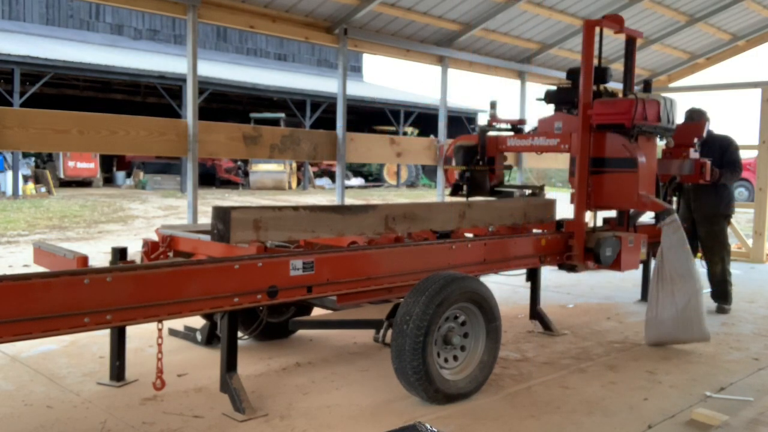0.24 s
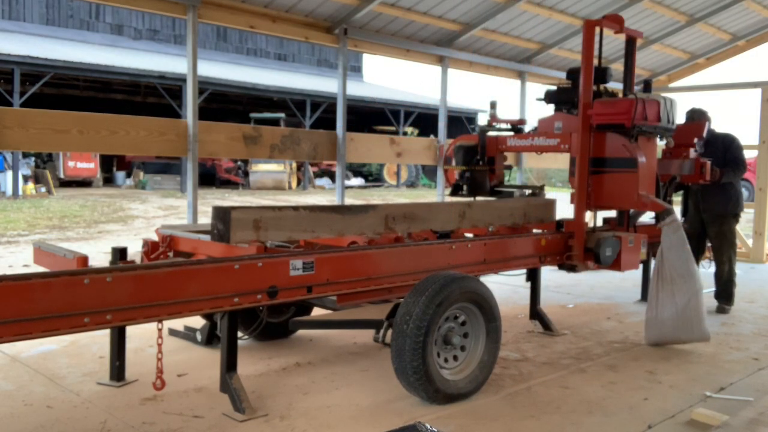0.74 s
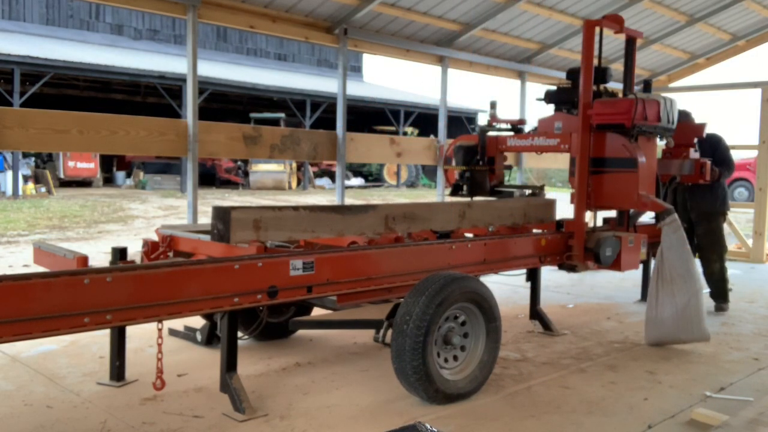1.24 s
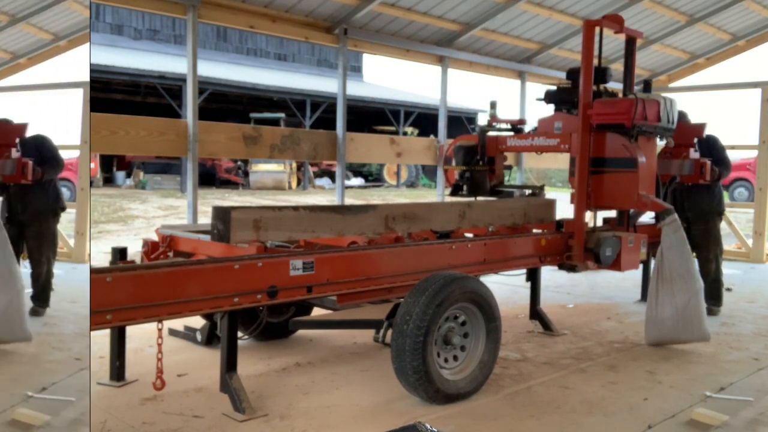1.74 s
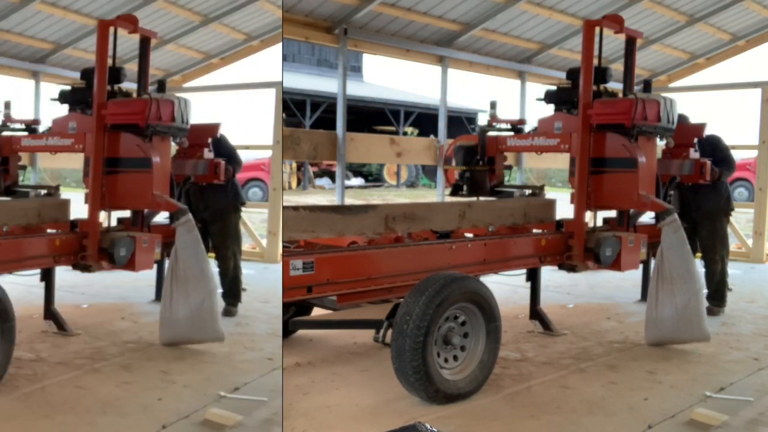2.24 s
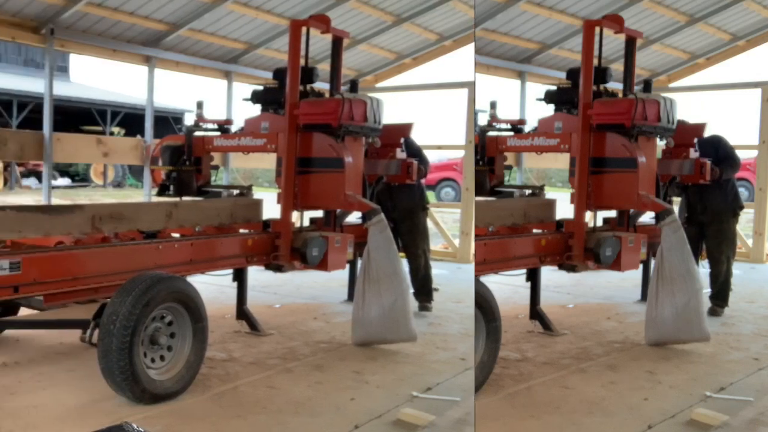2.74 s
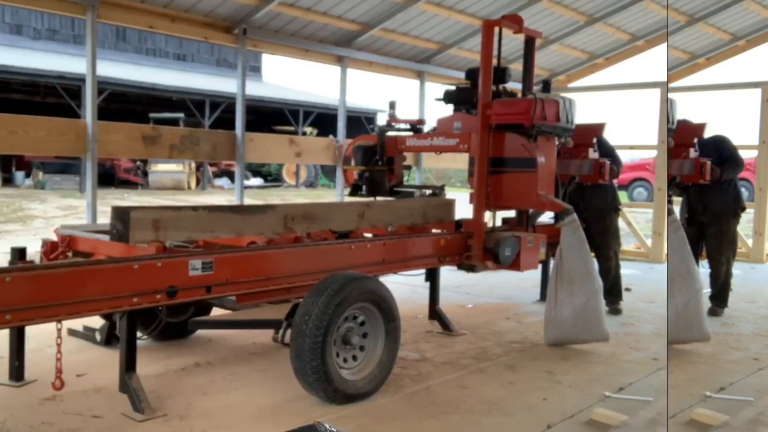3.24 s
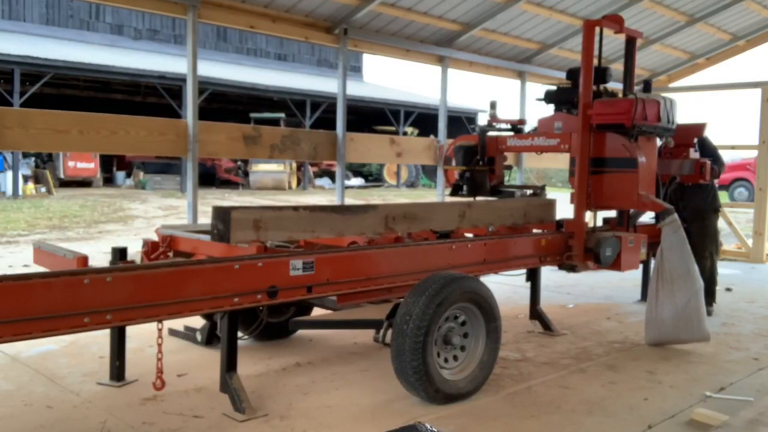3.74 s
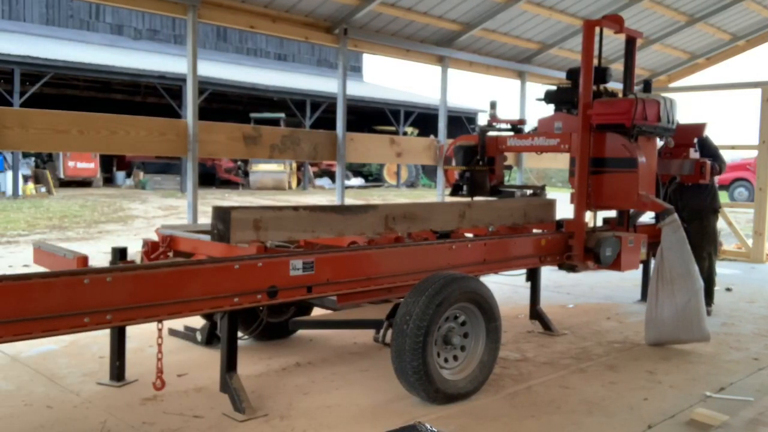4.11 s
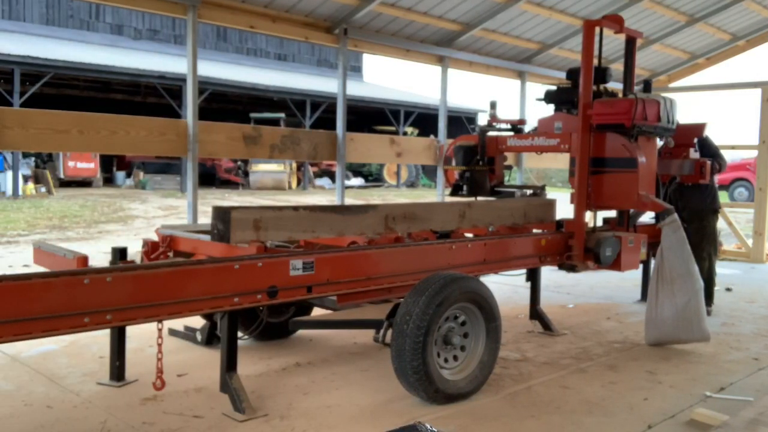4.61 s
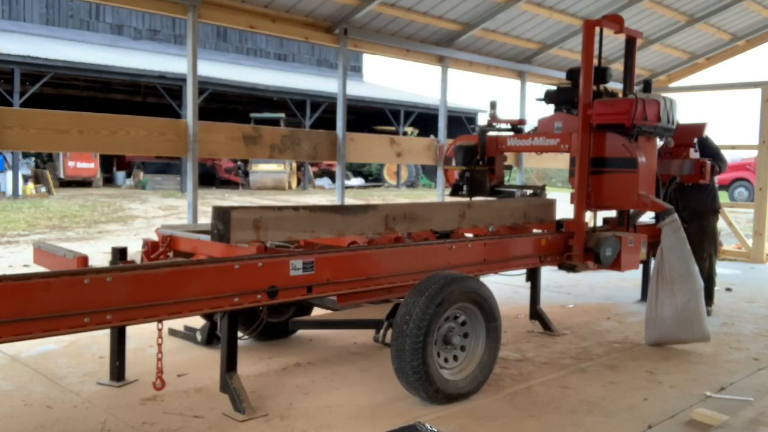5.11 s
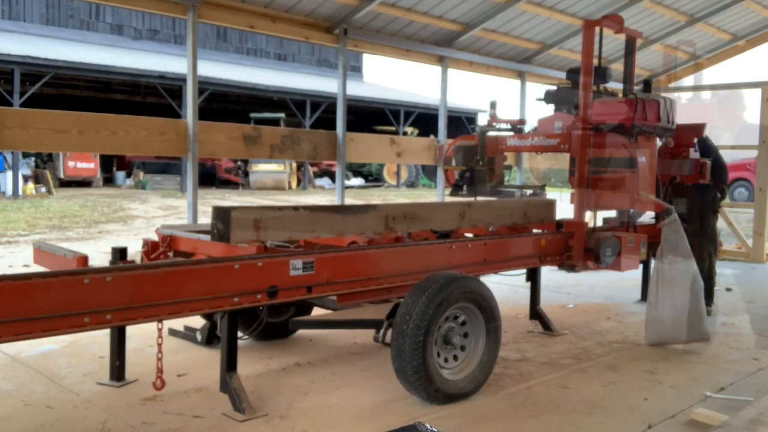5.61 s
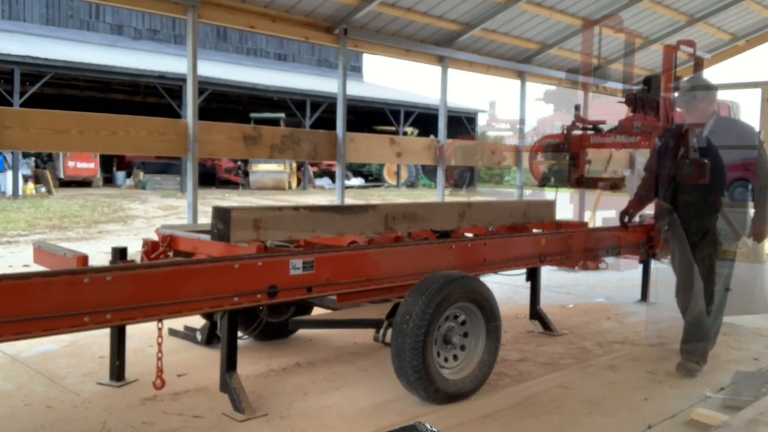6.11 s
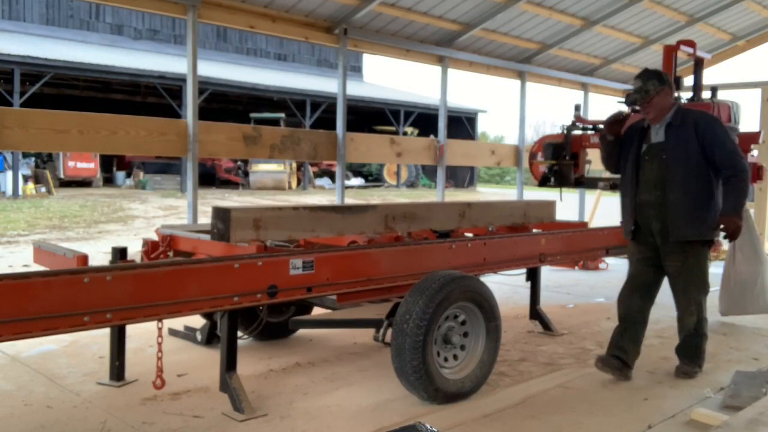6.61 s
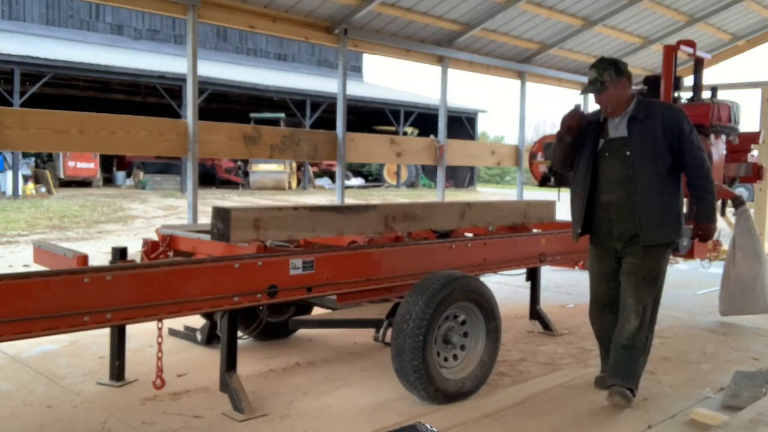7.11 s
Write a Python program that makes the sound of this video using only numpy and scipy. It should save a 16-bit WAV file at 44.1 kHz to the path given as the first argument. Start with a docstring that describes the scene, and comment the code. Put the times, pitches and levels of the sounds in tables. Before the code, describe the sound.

Brief belt screech, chugging engine revving up, steady bandsaw hiss and drone in an open shed, fading into faint rumble and gritty boot steps.

```python
"""A drive belt squeals while an engine labours up to speed and settles, in a portable bandsaw mill in an
open shed; the blade hisses and the casing roars. Resonated noise makes the squeal, filtered pulses the
exhaust blows, sine orders the free-running engine, and shaped noise the hiss and roar.
The mill fades away into a quiet yard: a far rumble of dull noise, a faint whine of narrow noise bands,
and boots on grit made of decaying noise."""
import sys
import numpy as np
from scipy import signal
from scipy.fft import rfft, irfft
from scipy.io import wavfile
from scipy.ndimage import uniform_filter1d

SR = 44100
rng = np.random.default_rng(int(sys.argv[2]) if len(sys.argv) > 2 else 0)


def persist_wave(psi):
    """Save psi, clipped to +-1, as 16-bit WAV."""
    counts = np.round(np.clip(psi, -1, 1) * 32767).astype(np.int16)
    wavfile.write(sys.argv[1], SR, np.atleast_2d(counts).T)


def gain_from_db(level_db):
    """Convert decibel levels to linear amplitude factors (20 dB per decade)."""
    decades = np.asarray(level_db, float) / 20
    return 10 ** decades


N = 324471  # length [samples]

# Engine speed, rising from idle, overshooting and settling: (time [s], four-stroke cycles [1/s])
ENGINE_SPEED = [(0, 11.3), (.15, 11.8), (.3, 13.4), (.7, 23.9), (1.05, 31.2), (1.3, 32.4), (1.8, 30.8),
                (2.5, 31.45), (3.2, 31.1), (4.3, 31), (5.2, 31.6), (5.75, 31.4)]
# Engine lines running free: (multiple of the cycle rate [1], relative level [dB])
CRANK_ORDERS = [(1, -30), (2, 0.5), (3, -18), (4, -16.5), (5, -12), (7, -2), (8, 1)]
DRONE_ORDERS = [(6, -1), (12, -20), (13, -17.5), (16, -17), (20, -15.5)]
# Level added to the drone orders, unsteady at first: (time [s], level [dB])
DRONE_LEVEL = [(1.1, -30), (1.4, -46), (1.53, -36), (1.6, -43), (1.72, -36.5), (1.97, -34.5), (2.42, -47),
               (2.8, -36), (4.4, -34), (5.15, -36), (5.23, -37.5), (5.37, -35.5), (6.5, -33)]
# Exhaust blows while labouring against the load: (time [s], level [dB])
LABOUR_LEVEL = [(0, -31), (.05, -27), (.25, -29.5), (.3, -23.5), (.52, -23.5), (.68, -26.5), (.93, -19.5),
                (1.0, -22.5), (1.08, -29), (1.5, -27.5)]
# Response of the exhaust pipe: (frequency [Hz], relative gain [dB])
PIPE_RESPONSE = [(20, -34), (40, -10.5), (60, 2), (85, -4.5), (125, -3.5), (175, 2), (230, -8),
                 (400, -16.5), (700, -35), (1500, -34)]
# Long waves leave the open shed: (frequency [Hz], gain into the echoes [dB])
SHED_RESPONSE = [(60, -19.5), (130, 0), (20000, 0)]

# Running mill: (time [s], blade hiss level [dB], casing roar level [dB])
MILL_LEVEL = [(0, -34, -26.5), (.07, -30.5, -28.5), (.29, -19.5, -25.5), (.54, -17.5, -24.5),
              (.85, -18.5, -24.5), (1.4, -21, -28.5), (1.6, -22.5, -30.5), (2.5, -26, -34.5),
              (3.0, -25.5, -34.5), (3.3, -24.5, -32.5), (4.9, -24.5, -32), (5.26, -26.5, -32),
              (5.45, -24.5, -32), (6.5, -24.5, -32)]
# Blade hiss spectrum: (frequency [Hz], relative density [dB])
HISS_SPECTRUM = [(1500, -42), (3000, -28.5), (4500, -10), (6000, -7.5), (7500, -9), (8400, 0.5),
                 (9300, -4.5), (10500, -0.5), (12500, -4), (14400, -1.5), (15600, -6), (16300, -67)]
# Blade hiss: (frequency [Hz], left-right likeness [1])
HISS_LIKENESS = [(3000, 0.15), (6000, 0.32), (7500, 1.0), (15000, 0.93)]
# The hiss tilts about 9 kHz as the blade settles: (time [s], added slope [dB per octave])
HISS_TILT = [(0, -6.5), (.5, -3.5), (1.2, 0.5), (2.5, 2.5), (4, 5), (6.5, 1)]
# Ringing of the taut blade: (frequency [Hz], bandwidth [Hz], level relative to the hiss [dB])
BLADE_MODES = [(3457, 50, -40.5), (4400, 50, -37), (4580, 41, -34), (4920, 19, -25.5), (5320, 60, -36.5),
               (6566, 32, -19.5), (7200, 72, -20), (7500, 54, -21), (7630, 40, -32.5), (8660, 82, -16.5)]
# Casing roar spectrum: (frequency [Hz], relative density [dB])
ROAR_SPECTRUM = [(20, -40), (45, -11), (100, -11.5), (140, -4.5), (200, -1), (330, -1), (400, 0.5),
                 (460, -4), (600, -0.5), (900, -2.5), (1500, -5), (1700, -6.5), (2450, -8.5), (3100, -11.5),
                 (4500, -8.5), (6000, -20.5), (9000, -45)]
# Casing roar: (frequency [Hz], left-right likeness [1])
ROAR_LIKENESS = [(60, 0.98), (200, 1), (350, 0.64), (650, 0.28), (1400, 0.83), (1900, .2), (2600, 0.34),
                 (6000, 0.11)]
# Casing roar: (frequency [Hz], left minus right level [dB])
ROAR_BALANCE = [(60, 1), (240, -1), (950, -3), (3770, -2), (15000, -2)]
# Casing roar: (frequency [Hz], phase lag of the right channel [rad])
ROAR_LAG = [(60, -0.5), (600, -0.34), (1500, -1.06), (2200, -1.5), (3000, -2.5), (4000, -1.5), (5000, 7)]

# Boot contacts: (time [s], scuff level [dB], tick level [dB], thud level [dB], scuff tilt [dB per octave])
BOOT_STEPS = [(6.578, -61.5, -60, -51, -10), (6.711, -71.5, -59, -65, -9), (7.066, -74, -66, -75, -8),
              (7.089, -50, -50, -51, -5.5), (7.098, -54, -56, -37, -13.5), (7.116, -55, -60, -45, -13.5),
              (7.241, -60, -36.5, -63, -5)]
# Thud of the sole: (frequency [Hz], relative gain [dB])
SOLE_RESPONSE = [(60, -15), (180, 4), (300, -2.5), (450, -5.5), (700, 3), (900, -15), (1200, -2),
                 (1500, -9), (2050, -4), (2500, -9), (6000, -37)]
# Tick of grit: (frequency [Hz], relative gain [dB])
TICK_RESPONSE = [(2500, -23), (5000, -1), (15500, -1), (17000, -63)]
# Yard wash spectrum: (frequency [Hz], relative density [dB])
YARD_SPECTRUM = [(25, -36), (60, -9), (87, -3.5), (127, -15), (223, -16), (330, -30), (560, -23.5),
                 (950, -23.5), (1700, -26), (2600, -36), (3500, -46.5), (5000, -58), (16000, -67.5)]
# Yard wash: (frequency [Hz], left-right likeness [1])
YARD_LIKENESS = [(60, 1), (380, 0.57), (2400, 0.055), (6000, 0.19), (9000, 0.81)]
# Far whine tones: (frequency [Hz], bandwidth [Hz], relative level [dB])
WHINE_TONES = [(75.2, 6.7, -54), (217.8, 10.5, -59), (559, 14, -67), (824, 31, -62.5), (1560, 30, -66),
               (1730, 60, -72)]
# Level added to all the whine tones: (time [s], level [dB])
WHINE_LEVEL = [(6.0, -9), (6.45, 2.5), (6.7, 1.5), (6.85, -10), (7.4, -14)]

FADE_FROM_S, FADE_TO_S = 5.424, 6.453  # the mill fades out while the yard fades in
FREE_FROM_S, FREE_RISE_S = 1.1, .35  # the clean orders take over as the load comes off
CRANK_DB, CRANK_EXTRA_DB, CRANK_SETTLE_S = -45, 14, 0.18  # added to the orders, from a louder start
SQUEAL_DB, SQUEAL_FALL_DB_PER_S = -15, 61  # the slip eases
GRIP_S, GRIP_FALL_DB_PER_S = .125, 170  # then the belt grips: further fall from this time
SQUEAL_TOP_HZ, SQUEAL_RISE_HZ, SQUEAL_RISE_S = 1515, 370, 0.06  # the tone climbs towards its top
GUARD_DB, GUARD_DROP_DB, GUARD_S = -2.5, 8.5, .045  # guard tones relative to the squeal, dropping sooner


def engine():
    """Periodic firing gives harmonic orders when running free, and two uneven blows a cycle under load."""
    cycles = np.cumsum(along(ENGINE_SPEED, silent=False)[0]) / SR
    free_s = np.arange(N) / SR - FREE_FROM_S
    rise = np.clip(free_s / FREE_RISE_S, 0, 1)
    crank_db = CRANK_DB + CRANK_EXTRA_DB * np.exp(-np.maximum(free_s, 0) / CRANK_SETTLE_S)
    running = np.zeros(N)
    for orders, db in [(CRANK_ORDERS, crank_db), (DRONE_ORDERS, along(DRONE_LEVEL)[0])]:
        lines = sum(gain_from_db(g) * np.sin(2 * np.pi * (k * cycles + rng.random())) for k, g in orders)
        running += np.sqrt(2) * gain_from_db(db) * lines * rise

    pulses = np.zeros(N)
    for place, db in [(0, 0.5), (.375, -0.5)]:  # the second cylinder fires before the half cycle
        at = np.flatnonzero(np.diff(np.floor(cycles + .3 - place)))
        pulses[at] += gain_from_db(db + 0.99 * rng.standard_normal(len(at)))
    pipe = evened(colour(pulses, PIPE_RESPONSE))
    blows = pipe + 0.43 * evened(resonate(pipe_input(pulses), 176, 25))  # the muffler rings on
    blows = blows + 1.22 * shed(colour(blows, SHED_RESPONSE), t60=0.6)
    # even out the running power so that the level curve alone sets the course
    blows /= np.sqrt(uniform_filter1d((blows ** 2).mean(0), size=6000) + 1e-12)
    fading = np.clip((LABOUR_LEVEL[-1][0] - np.arange(N) / SR) / 0.44, 0, 1)
    return running + blows * gain_from_db(along(LABOUR_LEVEL)[0]) * fading


def pipe_input(pulses):
    """The muffler is driven by the same firing pulses as the pipe."""
    return pulses


def blade():
    """Friction of teeth and wheels excites broadband hiss and modes; reflections ripple the spectrum."""
    hiss = evened(noise(HISS_SPECTRUM, HISS_LIKENESS, port_lag, patchy_db=0.6, ripple_db=4.0,
                        tilt=HISS_TILT))
    ring = sum(gain_from_db(db) * evened(resonate(rng.standard_normal(N), hz, width))
               for hz, width, db in BLADE_MODES)
    size = 2 ** 19
    turn = np.exp(-1j * port_lag(np.fft.rfftfreq(size, 1 / SR)))
    ring = np.array([ring, irfft(rfft(ring, size) * turn)[:N]])
    flutter = evened(uniform_filter1d(rng.standard_normal(N), size=250))
    return (hiss + ring) * gain_from_db(along(MILL_LEVEL)[0] + 0.3 * flutter)


def casing():
    """Fan, wheels and sheet metal radiate broadband noise, partly coherent between the channels."""
    roar = noise(ROAR_SPECTRUM, ROAR_LIKENESS, lambda hz: read(ROAR_LAG, hz), patchy_db=1.22,
                 ripple_db=1.6, balance=ROAR_BALANCE)
    return evened(roar) * gain_from_db(along(MILL_LEVEL)[1])


def belt():
    """Stick-slip friction: dense uneven slips ring two rising tones and two fixed tones of the guard."""
    t = np.arange(SR // 2) / SR
    db = SQUEAL_DB - SQUEAL_FALL_DB_PER_S * t - GRIP_FALL_DB_PER_S * np.maximum(t - GRIP_S, 0)
    hz = SQUEAL_TOP_HZ - SQUEAL_RISE_HZ * np.exp(-t / SQUEAL_RISE_S)
    guard_db = GUARD_DB - GUARD_DROP_DB * np.tanh((t / GUARD_S) ** 2)
    uneven = evened(uniform_filter1d(rng.standard_normal(len(t)), size=150))
    slips = rng.standard_normal((2, len(t))) * gain_from_db(1.5 * uneven)
    slips[1] = 0.23 * slips[0] + 2.0 * slips[1]  # the channels are only slightly alike
    bands = [(hz, 270), (0.884 * hz, 220), (2330, 300), (3400, 500)]  # (frequency, bandwidth) in Hz
    out = np.zeros((2, N))
    for channel, x in zip(out, slips):
        tones = [evened(resonate(resonate(x, f, width), f, width)) for f, width in bands]
        squeal = tones[0] + 0.24 * tones[1]
        guard = tones[2] + 0.42 * tones[3]
        channel[:len(t)] = gain_from_db(db) * (squeal + gain_from_db(guard_db) * guard)
    return out


def boots():
    """Impact and friction: a tick of grit, a gritty scuff that dies away and the thud of the sole."""
    out, t = np.zeros((2, N + SR)), np.arange(2 ** 14) / SR
    turn = np.exp(-1j * port_lag(np.fft.rfftfreq(len(t), 1 / SR), from_hz=7400))
    fall = gain_from_db(-60 * t / 0.39) * (1 - np.exp(-t / .0015))  # 60 dB in 0.39 s after a short rise
    thump = fall * (0.73 + 0.98 * np.exp(-t / 0.0041))
    for start_s, scuff_db, tick_db, thud_db, tilt_db in BOOT_STEPS:
        grit, other = rng.standard_normal((2, len(t)))
        top_db = np.log2(16 / 3) * tilt_db
        scuff = evened(colour(grit, [(1000, -27), (3000, -4), (16000, top_db), (17000, -58.5)])) * fall
        tick = evened(colour(grit, TICK_RESPONSE)) * np.exp(-t / .0013)
        bright = gain_from_db(scuff_db) * scuff + gain_from_db(tick_db) * tick
        brights = (bright, irfft(rfft(bright) * turn))
        soles = (grit, 0.52 * grit + 0.94 * other)
        for channel, high, x in zip(out, brights, soles):
            thud = gain_from_db(thud_db) * evened(colour(x, SOLE_RESPONSE)) * thump
            channel[round(start_s * SR):][:len(t)] += high + thud
    return out[:, :N]


def yard():
    """Diffuse broadband noise makes a dull wash; narrow bands of noise make wavering far tones."""
    wash = noise(YARD_SPECTRUM, YARD_LIKENESS, lambda hz: port_lag(hz, from_hz=7400), patchy_db=1.0)
    tones = sum(gain_from_db(db) * evened(resonate(resonate(rng.standard_normal(N), hz, width), hz, width))
                for hz, width, db in WHINE_TONES)
    return evened(wash) * gain_from_db(-49.5) + tones * gain_from_db(along(WHINE_LEVEL)[0])


def shed(x, t60):
    """Reverberation as sparse decaying echoes of random sign from roof, posts and floor."""
    t = np.arange(SR // 2) / SR
    signs = rng.choice([-1., 1.], (2, len(t)))
    present = rng.random((2, len(t))) < 2000 / SR  # 2000 echoes a second on average
    taps = signs * present * gain_from_db(-60 * t / t60) * (t > .004)
    taps = taps[0] + np.outer([.12, -.12], taps[1])  # nearly alike in both channels
    return signal.oaconvolve(x[None], taps / np.linalg.norm(taps[0]), axes=1)[:, :len(x)]


def port_lag(hz, from_hz=3400):
    """Phase growing linearly is a delay: above from_hz the right channel is a quarter millisecond behind."""
    return 2 * np.pi * np.maximum(hz - from_hz, 0) * 0.0002508


def noise(points, same, lag, patchy_db, ripple_db=0, balance=((20, 0), (20000, 0)),
          tilt=((0, 0), (9, 0)), size=2048):
    """Partly coherent stereo noise by random spectra, with short patches and slowly drifting ripples."""
    frames, hz = 4 * N // size + 5, np.fft.rfftfreq(size, 1 / SR)
    a, b, c, d, patches, ripples = rng.standard_normal((frames, len(hz), 6)).T
    patches = evened(uniform_filter1d(uniform_filter1d(patches, size=15, axis=0), size=6, axis=1))
    ripples = evened(uniform_filter1d(uniform_filter1d(ripples, size=3, axis=0), size=90, axis=1))
    like = np.clip(read(same, hz), -1, 1)[:, None]
    left = a + 1j * b
    right = like * left * np.exp(-1j * lag(hz))[:, None] + np.sqrt(1 - like ** 2) * (c + 1j * d)
    shape_db = read(points, hz)[:, None] + patchy_db * patches + ripple_db * ripples
    slope = np.interp(np.arange(frames) * size / 4 / SR, *np.transpose(tilt))
    shape_db = shape_db + np.outer(np.log2((hz + 1) / 9000), slope)
    balance_db = np.outer([.5, -.5], read(balance, hz))[:, :, None]
    z = np.array([left, right]) * gain_from_db(shape_db) * gain_from_db(balance_db)
    return signal.istft(z, nperseg=size, noverlap=3 * size // 4)[1][:, :N]


def colour(x, points):
    """A minimum-phase filter from a gain table: causal, so blows ring after they land."""
    size = 8192
    log_gain = np.log(gain_from_db(read(points, abs(np.fft.fftfreq(size, 1 / SR)))))
    taps = np.fft.ifft(np.exp(np.conj(signal.hilbert(log_gain)))).real[:size // 2]
    return signal.oaconvolve(x, taps)[:len(x)]


def resonate(x, hz, width):
    """A resonance by heterodyne: shifts hz (fixed or moving) to zero, smooths, and shifts back."""
    turn = np.exp(2j * np.pi * np.cumsum(hz * np.ones(len(x))) / SR)
    r = np.exp(-np.pi * width / SR)
    return 2 * (turn * signal.lfilter([1 - r], [1, -r], x / turn)).real


def evened(x):
    """Normalises the mean power: scales to rms 1."""
    return x / np.sqrt(np.mean(x ** 2) + 1e-20)


def read(points, hz):
    """Interpolates a table on a logarithmic frequency axis."""
    f, value = np.transpose(points)
    return np.interp(np.log(hz + 1), np.log(f + 1), value)


def along(rows, silent=True):
    """Interpolates each column in time; with silent, dB columns are inaudible outside their span."""
    s, *columns = np.transpose(rows)
    edge = -200 if silent else None
    return [np.interp(np.arange(N) / SR, s, c, edge, edge) for c in columns]


def fade():
    """Linear amplitude fade: the mill's gain is one, then slopes evenly down to nothing."""
    return np.clip((FADE_TO_S - np.arange(N) / SR) / (FADE_TO_S - FADE_FROM_S), 0, 1)


def waver():
    """Slow amplitude modulation: twice-smoothed noise drifts the level by 0.5 dB rms."""
    drift = uniform_filter1d(uniform_filter1d(rng.standard_normal(N), size=3000), size=3000)
    return gain_from_db(0.5 * evened(drift))


def scene():
    """Superposition of the sources: the mill crossfades into the yard, and boots are added."""
    mill = engine() * gain_from_db([[.3], [-.3]])  # slightly left, in dB
    mill = mill + blade() * waver() + casing() * waver() + belt()
    return mill * fade() + yard() * (1 - fade()) + boots()


def roll_off(x):
    """The treble ends steeply here."""
    return signal.sosfilt(signal.butter(12, 16360, fs=SR, output="sos"), x)


def record(dry):
    """The microphone's bass cut, a fourth-order high-pass at 36 Hz, finishes the mix."""
    finished = signal.sosfilt(signal.butter(4, 36, "high", fs=SR, output="sos"), dry)
    return roll_off(finished)


dry = scene()
out = record(dry)
persist_wave(out)
```